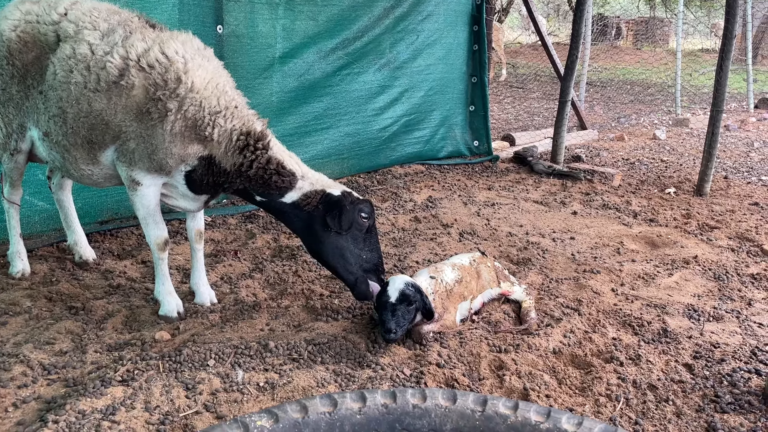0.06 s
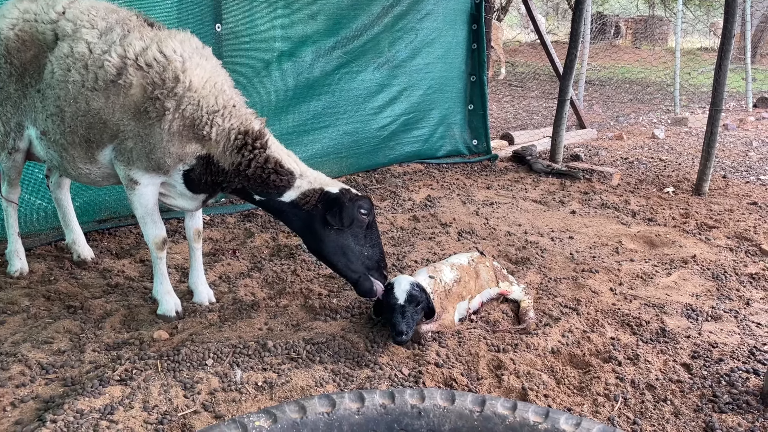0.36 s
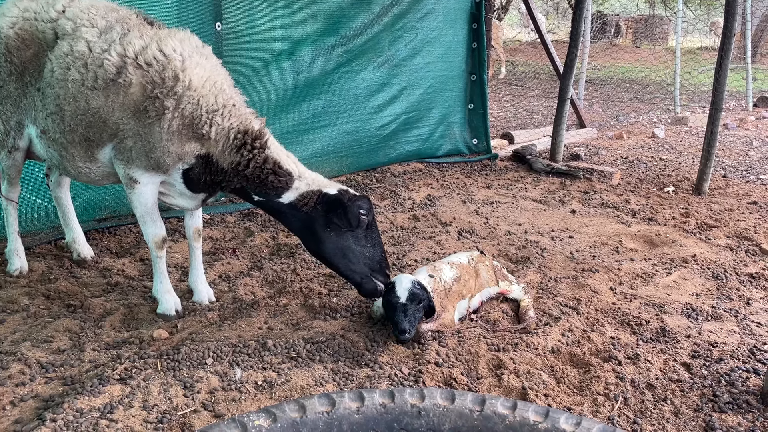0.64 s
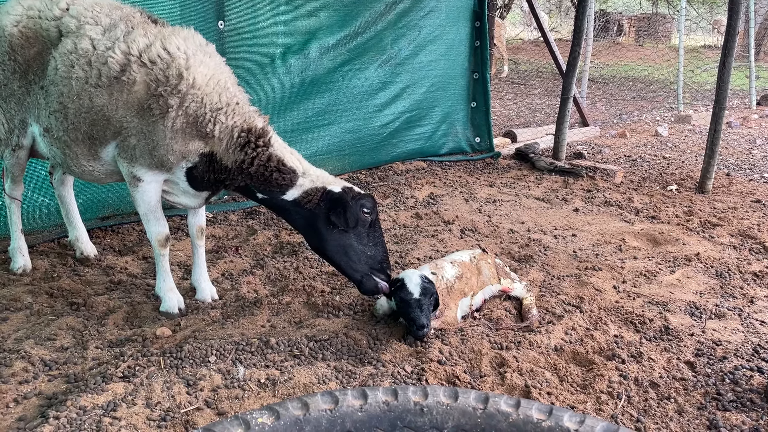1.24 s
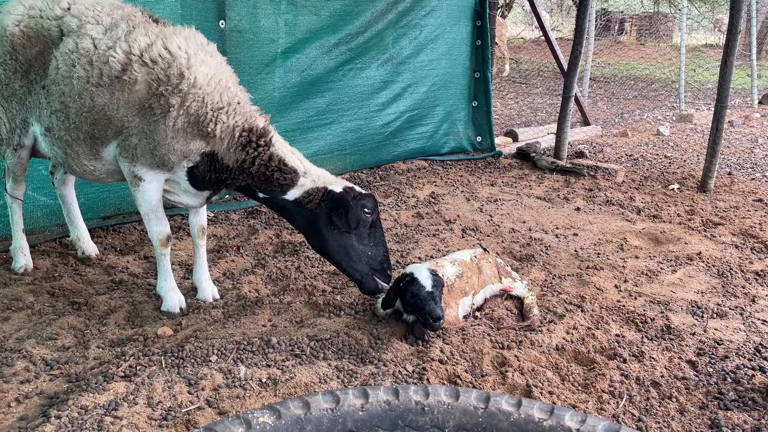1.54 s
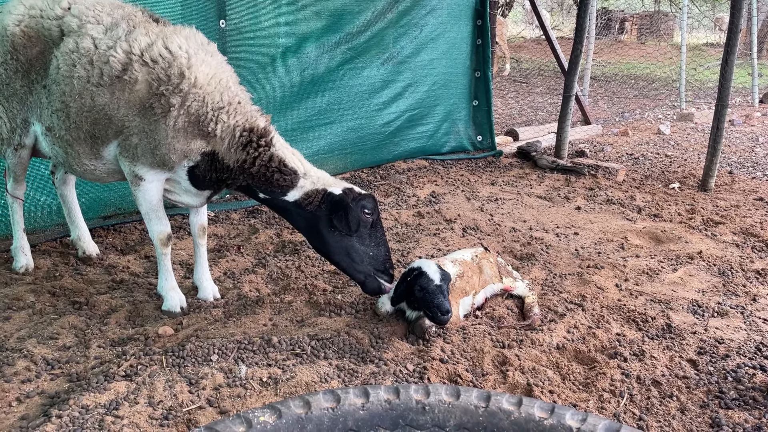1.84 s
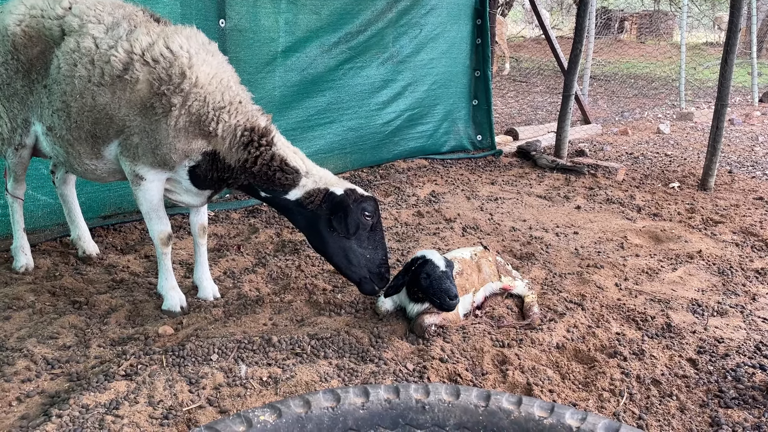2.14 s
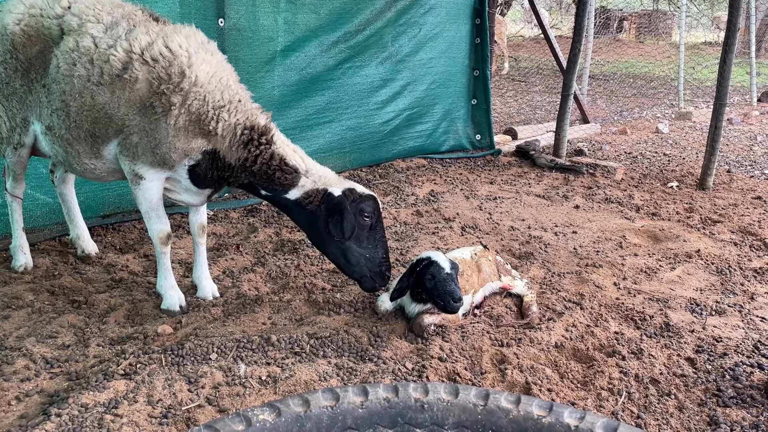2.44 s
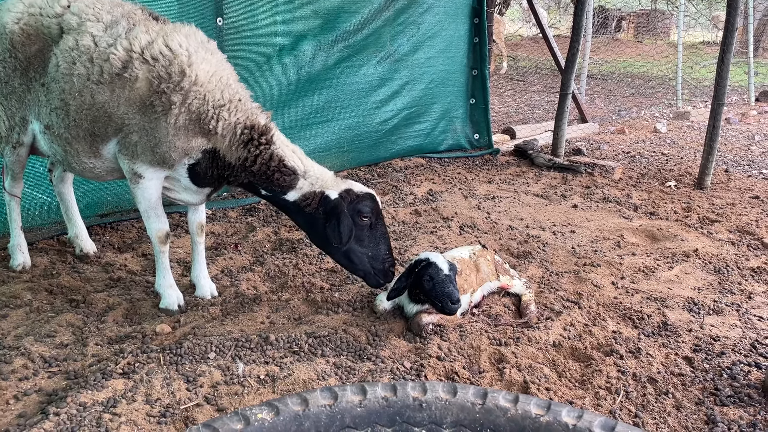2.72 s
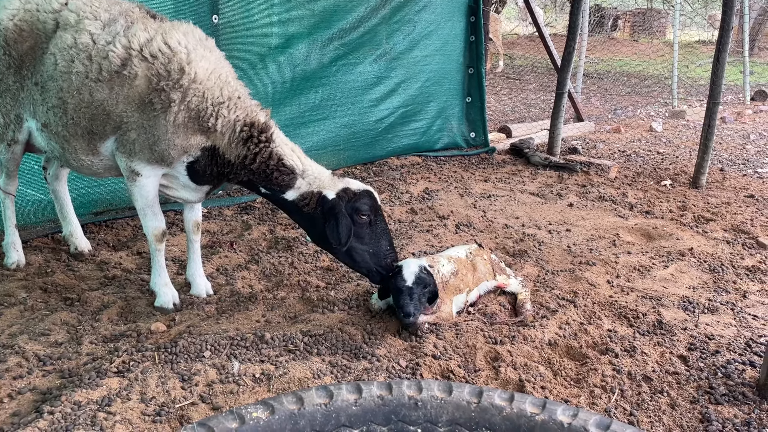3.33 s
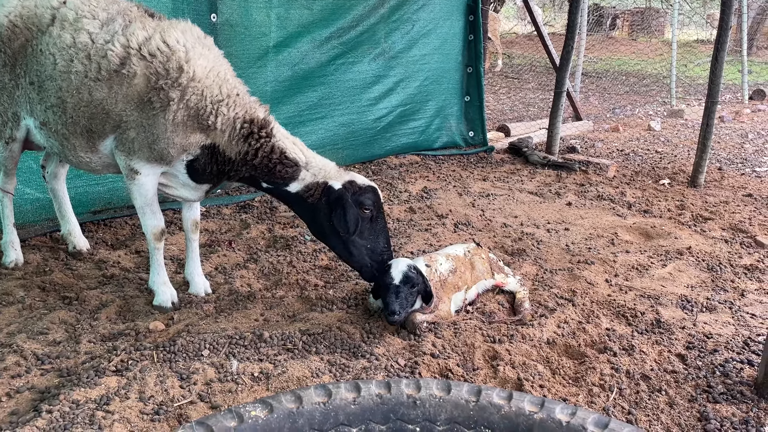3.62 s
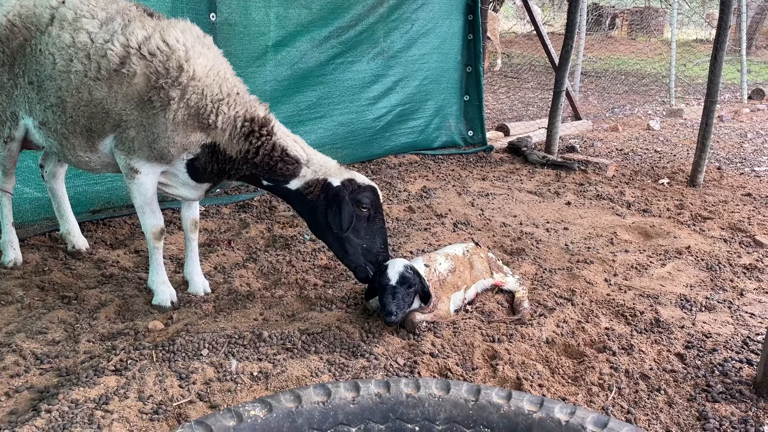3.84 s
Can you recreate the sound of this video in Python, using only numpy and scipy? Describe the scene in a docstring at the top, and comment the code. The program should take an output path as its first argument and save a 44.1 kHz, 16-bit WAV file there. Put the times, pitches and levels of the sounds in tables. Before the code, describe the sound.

A ewe gives a low, quavering bleat and later a fainter grunt, while a bird buzzes and chirps over a low outdoor rumble.

```python
"""An open pen, where a ewe murmurs to her lamb: one low, closed-mouth bleat that breaks into a rattle,
later a short falling grunt. Her vocal folds make the tone, and rattle when they flap unevenly.
A bird nearby sings a long sizzling song of buzzes, chirps and slowing ticks. Dull thumps, a scuff,
snapping straw and a few sharp, high chips (probably a bird's) sound over rumbling air, a low hum
and a distant machine."""
import sys
import numpy as np
from scipy import signal
from scipy.fft import rfft, irfft, next_fast_len
from scipy.io import wavfile
from scipy.ndimage import uniform_filter1d

SR = 44100
rng = np.random.default_rng(int(sys.argv[2]) if len(sys.argv) > 2 else 0)


def bounce(signal):
    """Save signal as a 16-bit WAV file at the path given by the first command-line argument."""
    frames = np.transpose(np.atleast_2d(signal))
    limited = np.clip(frames, -1, 1)
    pcm = np.round(limited * 32767).astype(np.int16)
    wavfile.write(sys.argv[1], SR, pcm)


N = 267246
TIME = np.arange(N) / SR


def from_db(db):
    """Turn decibels into a number to multiply by."""
    return 10 ** (np.asarray(db) / 20)


def rms_one(x):
    """Scale a signal so that its average power is 1."""
    return x / np.sqrt(np.mean(x ** 2) + 1e-20)


def in_time(rows):
    """Join a table's rows with straight lines: one curve for each column after the time."""
    times, *columns = np.transpose(rows)
    return [np.interp(TIME, times, column) for column in columns]


def gain_by_hz(points):
    """Turn (f/Hz, level/dB) rows into a gain for every frequency."""
    hz, db = np.transpose(points)
    return from_db(np.interp(np.log(np.fft.rfftfreq(N, 1 / SR) + 1), np.log(hz), db))


def phase_of(hz):
    """The angle a vibration has turned through so far: 2 pi for each cycle."""
    return 2 * np.pi * np.cumsum(hz) / SR


def drift(per_s):
    """A random wander of about 1 either way; per_s sets how fast it moves."""
    size = next_fast_len(N, real=True)
    rolloff = 1 + (np.fft.rfftfreq(size, 1 / SR) / per_s) ** 4
    return rms_one(irfft(rfft(rng.standard_normal(size)) / rolloff, size)[:N])


def filtered(x, hz, kind):
    """Keep the "low", "high" or "band" part of a sound."""
    return signal.sosfilt(signal.butter(2, hz, kind, fs=SR, output="sos"), x)


def arch(start, length):
    """A rounded rise and fall in loudness."""
    return np.sqrt(np.sin(np.pi * np.clip((TIME - start) / length, 0, 1)) + 1e-15)


def held(start, end, attack_s=0.0063, release_s=0.063):
    """Loudness that rises, holds until the end time, then dies away."""
    return np.clip((TIME - start) / attack_s, 0, 1) * np.exp(-np.maximum(TIME - end, 0) / release_s)


def resonate(x, hz, width_hz):
    """Let a sound ring around one pitch by passing it twice through the same resonance."""
    r = np.exp(-np.pi * width_hz / SR)
    feed = np.array([1, 0, -1]) * (1 - r * r) / 2
    feedback = [1, -2 * r * np.cos(2 * np.pi * hz / SR), r * r]
    for _ in range(2):
        x = signal.lfilter(feed, feedback, x + 1e-18)
    return x


def wavering_tone(hz, waver_hz, waver_per_s):
    """A pure tone whose pitch wanders a little."""
    return np.sqrt(2) * np.sin(phase_of(hz + waver_hz * drift(waver_per_s)))


# how wide the sound is: f/Hz, side level compared with mid/dB
WIDTH = [(30, -4), (65, -11.5), (150, -12), (350, -6), (780, -2.5), (1300, -2.5), (2000, 1), (2800, -4),
         (4100, -4.5), (5200, -3), (7000, -1.5), (8800, 17), (10500, -26), (13000, 1)]
def widen(mid, side):
    """Make left and right: both get mid, while side is added to one and taken from the other."""
    width = gain_by_hz(WIDTH)
    return irfft((rfft(mid) + width * rfft(side) * [[1], [-1]]) / np.sqrt(1 + width ** 2), N)


def noise(colour):
    """Stereo noise; its colour says how strong the lows and highs are compared with each other."""
    white = widen(*rng.standard_normal((2, N)))
    return rms_one(irfft(rfft(white) * gain_by_hz(colour), N))


def narrow_noise(hz, width_hz):
    """Stereo noise gathered round a pitch that may move."""
    phase = phase_of(hz * np.ones(N))
    bands = [drift(width_hz / 2) * np.cos(phase) + drift(width_hz / 2) * np.sin(phase) for _ in range(2)]
    return rms_one(widen(*bands))


def pen_echoes(x, wet_db, t60):
    """Mix in echoes off tarpaulin, posts and ground; they fade by 60 dB in t60 seconds."""
    t = TIME[:SR // 2]
    echoes = rng.standard_normal((2, len(t))) * (rng.random((2, len(t))) < .03) * from_db(-60 * t / t60)
    echoes /= np.sqrt(np.sum(echoes ** 2, axis=1, keepdims=True))
    wet = widen(*signal.fftconvolve(np.atleast_2d(x), echoes, axes=1)[:, :N])
    return (x + from_db(wet_db) * wet) / np.sqrt(1 + from_db(wet_db) ** 2)


# colours of the rumble and of its deepest part: f/Hz, level/dB
RUMBLE_COLOUR = [(32, -51), (55, -3.5), (79, -2), (113, -8.5), (139, -9.5), (161, -20.5), (188, -20),
                 (260, -34.5), (340, -37.5), (570, -120)]
DEEP_COLOUR = [(10, -48), (22, -32), (36, -5.5), (48, 2), (60, -37), (90, -53), (300, -120)]
# how far the rumble eases off: t/s, added level/dB
LULL = [(4.3, -7.5), (4.8, -10.5), (5.42, -8.5), (5.6, -2)]
# gusts: t/s, length/s, rumble level/dB, deep level/dB
GUSTS = [(0.214, 0.11, -48, -67), (0.434, 0.24, -49.5, -59), (0.855, 0.082, -48, -65),
         (1.457, 0.26, -50.5, -55.5), (1.726, 0.2, -48, -52), (2.034, 0.13, -53, -51.5),
         (2.502, 0.29, -49, -63), (3.374, 0.51, -50, -68), (4.255, 0.15, -48.5, -59),
         (4.48, 0.26, -53, -51)]
def wind(base_db=-50, deep_base_db=-66, flutter_db=3.0):
    """Moving air rumbles and swells with each gust."""
    lull_db, = in_time(LULL)
    body = from_db(base_db + lull_db + flutter_db * drift(1.5))
    deep = from_db(deep_base_db)
    for start, length, body_db, deep_db in GUSTS:
        gust = arch(start, length)
        body = np.maximum(body, from_db(body_db) * gust)
        deep = np.maximum(deep, from_db(deep_db) * gust)
    return body * noise(RUMBLE_COLOUR) + deep * noise(DEEP_COLOUR)


# the hum's loudness: t/s, level/dB
HUM_LEVEL = [(.72, -63), (.9, -57), (1.45, -54), (2.15, -55.5), (2.4, -57.5), (4.3, -58.5), (4.8, -72),
             (5.42, -72), (5.6, -63)]
def hum(hz=66.6):
    """A low, wavering hum that swells and sinks."""
    level_db, = in_time(HUM_LEVEL)
    return from_db(level_db + 1.5 * drift(2.5)) * wavering_tone(hz, waver_hz=1.485, waver_per_s=2.91)


# colour of the air around the pen: f/Hz, level/dB
AIR_COLOUR = [(88, -14.5), (150, 0), (519, -14), (626, -15.5), (770, -8), (1080, -20.5), (1730, -23),
              (2920, -22), (3400, -28.5), (4680, -34), (7080, -15), (7920, -15.5), (8380, -21.5),
              (11300, -52.5), (13400, -74)]
def open_air(level_db=-65.0):
    """A soft, flickering outdoor hush."""
    return from_db(level_db + 2.2 * drift(22)) * noise(AIR_COLOUR)


# far-off calls: t/s, length/s, f/Hz, level/dB
FAR_CALLS = [(0.34, 0.46, 1555, -67.5), (1.068, 0.66, 1580, -72), (2.59, 0.43, 1403, -72.5),
             (4.2, 0.43, 1550, -77)]
def far_calls():
    """Each faint call is a swell of noise around one pitch."""
    return sum(from_db(db) * arch(start, length) * narrow_noise(hz, width_hz=230)
               for start, length, hz, db in FAR_CALLS)


def distant_machine(roar_db=-67.5, whine_db=-77.5):
    """A droning roar in one broad resonance, with a thin whine near its centre."""
    white = widen(*rng.standard_normal((2, N)))
    roar = rms_one(resonate(white, hz=780.5, width_hz=129))
    whine = from_db(whine_db + 3 * drift(3)) * wavering_tone(hz=776, waver_hz=2.056, waver_per_s=5.7)
    return from_db(roar_db + 2 * drift(9.5)) * roar + whine


# colour of the scuff: f/Hz, level/dB
SCUFF_COLOUR = [(1200, -13), (2600, -15), (3600, -1.5), (5400, 4.5), (6300, -6), (7800, -15), (9500, -24),
                (13000, -37)]
def dirt_scuff(level_db=-50.5):
    """One short scuff in the dirt: a puff of hiss."""
    swell = held(start=3.378, end=3.455, attack_s=0.033, release_s=0.029)
    return pen_echoes(from_db(level_db) * swell * noise(SCUFF_COLOUR), wet_db=-6, t60=0.085)


# snapping straw: t/s, level before filtering/dB
SNAPS = [(.336, -58), (1.77, -55), (2.112, -53.5)]
def straw_snaps():
    """Dry straw breaks with tiny bursts of bright noise."""
    bursts = sum(from_db(db) * held(start, start, attack_s=.0002, release_s=0.0019) for start, db in SNAPS)
    return filtered(bursts * rng.standard_normal(N), [5000, 13000], "band")


# dull thumps: t/s, level/dB, final f/Hz, swell time/s, sharpness (0-1)
THUMPS = [(.438, -37.5, 62, 0.034, 0.009), (0.581, -42, 53.7, 0.022, 0.059), (2.77, -42, 82.5, 0.013, 0.28),
          (2.820, -49.5, 109, 0.011, 0), (3.379, -44, 109.9, 0.025, 0.4), (4.626, -50.5, 81, 0.011, 0.06),
          (5.065, -47, 77, 0.019, 0), (5.753, -33, 68.3, 0.017, 0.16), (5.856, -49.5, 83.5, 0.032, 0.36),
          (5.970, -39, 61.6, 0.018, 0.23)]
def thumps(dull_hz=900, drop_hz=800, fall_s=0.00473, knock_hz=610, knock_db=-3, knock_s=0.0063):
    """The highs arrive first, so the pitch drops into a short boom; sharp thumps add a hollow knock."""
    out, t = np.zeros(N), TIME[:SR // 12]
    knock = from_db(knock_db) * np.exp(-t / knock_s) * np.sin(2 * np.pi * knock_hz * t)
    for start, db, end_hz, swell_s, sharpness in THUMPS:
        hz = end_hz + drop_hz / (1 + t / fall_s) ** 2
        age = t / swell_s
        body = age ** 2 * np.exp(2 * (1 - age)) + sharpness * np.exp(-age)
        boom = body * np.sin(phase_of(hz)) / (1 + (age / 2) ** 4)
        at = int(start * SR)
        out[at:at + len(t)] += from_db(db) * (boom + sharpness * knock)[:N - at]
    return pen_echoes(filtered(out, dull_hz, "low"), wet_db=-16, t60=.1)


# the tones each chip rings with: f/Hz, level/dB, time to fade by 60 dB/s
CHIP_TONES = [(2075, -11, 0.078), (2704, 0.5, 0.053), (4390, 1, 0.053), (4330, -15, 0.47),
              (6660, -27, 0.068), (11400, -25, 0.16)]
# chips: t/s, level/dB, burst length/s, pitch factor of the upper tones, boost of the two low tones/dB
CHIPS = [(0.23, -44, 0.02, 1.025, -8.5), (0.491, -61.5, 0.016, 1.015, 2.5),
         (0.847, -44.5, 0.0081, 1.04, -2)]
def sharp_chips(attack_s=0.0055, chatter_hz=80, hiss_db=-6):
    """Short, sharp, high chips, probably a bird's: a burst of hiss and shaky tones that ring briefly."""
    out, shake = np.zeros(N), drift(160)
    hiss = filtered(rng.standard_normal(N), [2000, 7500], "band")
    for start, level_db, length, pitch_factor, low_db in CHIPS:
        burst = held(start, start + length, attack_s, release_s=0.0079)
        chip = from_db(hiss_db) * burst * hiss
        for k, (hz, db, t60) in enumerate(CHIP_TONES):
            hz, db = (hz, db + low_db) if k < 2 else (hz * pitch_factor, db)
            ring = held(start, start + length, attack_s, release_s=t60 / np.log(1000))
            chip += from_db(db) * ring * np.sin(phase_of(hz + chatter_hz * shake * burst))
        out += from_db(level_db) * chip
    highs = filtered(out, 2200, "high")   # keep only the highs
    return pen_echoes(highs, wet_db=-13, t60=.35)


# chirps: t/s, length/s, start f/Hz, end f/Hz, level/dB, rasp (0-1)
CHIRPS = [(0.123, 0.045, 4620, 4610, -58.5, 0.03), (0.147, 0.028, 4600, 4170, -66, 0),
          (0.579, 0.0247, 2630, 3300, -66, 0.89), (0.785, 0.04, 2890, 3200, -74, 0.9),
          (0.903, 0.016, 3780, 4150, -61, 1), (0.935, 0.041, 4200, 3460, -65.5, 1),
          (1.005, 0.047, 2995, 3520, -60, 0.73), (1.092, 0.027, 5850, 3320, -50, 0.34),
          (1.11, 0.034, 5300, 3150, -53.5, 0.37), (1.153, 0.021, 4940, 3620, -57.5, 0.6),
          (1.167, 0.039, 5200, 3860, -59, 0.43), (1.205, 0.02, 5900, 5440, -59, 0.74),
          (1.218, 0.044, 5480, 4850, -49.5, 0.64), (1.26, 0.027, 4620, 5630, -58.5, 0.76),
          (3.117, 0.13, 10750, 10100, -65.5, 0.2), (3.233, 0.1, 10100, 9800, -77, 0.8),
          (4.808, 0.026, 3830, 3030, -74, 0.06), (4.823, 0.03, 6650, 5900, -73, 0.15),
          (4.85, 0.04, 5450, 4800, -70, 0.15), (4.865, 0.039, 5850, 5700, -69, 0.1),
          (4.874, 0.048, 4000, 3020, -74.5, 0.1), (4.905, 0.034, 4750, 4300, -66, 0.2),
          (4.908, 0.072, 5780, 4760, -65, 0.2), (4.978, 0.045, 5830, 5350, -70, 0.3),
          (5.028, 0.045, 3316, 3280, -72, 0), (5.151, 0.034, 3070, 3070, -66, 0.5),
          (5.264, 0.046, 3020, 2977, -64, 0.1), (5.863, 0.074, 9500, 9700, -84, 0.4),
          (5.915, 0.088, 9800, 9750, -78, .3), (5.995, 0.078, 9650, 9600, -85, 0.4)]
def bird_chirps(rasp_hz=400):
    """Gliding whistles that start firmly; a fast shake of the pitch makes some of them raspy."""
    out, shake = np.zeros(N), drift(530)
    for start, length, start_hz, end_hz, db, rasp in CHIRPS:
        along = np.linspace(0, 1, int(length * SR))
        shake_hz = rasp * rasp_hz * np.roll(shake, rng.integers(N))[:len(along)]
        hz = start_hz + (end_hz - start_hz) * along + shake_hz
        swell = 2 * np.minimum(along * 6, 1) * np.sqrt(1 - along)
        note = from_db(db) * swell * np.sin(phase_of(hz))
        at = int(start * SR)
        out[at:at + len(note)] += note[:N - at]
    return pen_echoes(out, wet_db=-6, t60=.2)


# the ticking that ends the song: t/s, ticks per second, level/dB
TICKS = [(3.82, 85, -62), (4.3, 67, -62), (4.5, 58.7, -58.5), (4.72, 52, -58.5), (5.0, 40, -61.5),
         (5.3, 29.3, -62), (5.43, 27, -59), (5.48, 26, -68), (5.65, 23, -64)]
def bird_ticks(pip_s=0.0037, centre_hz=4250, sink_hz_per_s=140, fall_hz=280, high_hz=6850, wobble_hz=250):
    """A slowing, sinking run of husky pips, each sliding down; for a while a higher note joins in."""
    rate, level_db = in_time(TICKS)
    start, end = TICKS[0][0], TICKS[-1][0]
    count = np.cumsum(rate) / SR
    count -= np.interp(5.138, TIME, count)   # one tick falls at this time and sets the beat
    from_pip_s = ((count + .5) % 1 - .5) / rate
    pips = np.exp(-(from_pip_s / pip_s) ** 2)
    low_hz = centre_hz - sink_hz_per_s * np.maximum(TIME - start, 0)
    low_hz -= fall_hz * np.tanh(from_pip_s / pip_s)
    low_gain = from_db(level_db) * held(start, end, attack_s=0.0078, release_s=0.018)
    high_gain = from_db(-63) * held(start=4.39, end=4.68)
    notes = sum(gain * np.sin(phase_of(hz + wobble_hz * drift(394)))
                for hz, gain in [(low_hz, low_gain), (high_hz, high_gain)])
    return pen_echoes(pips * notes, wet_db=-4, t60=.1)


# how the song pulses: t/s, pulses per second, pulsed share (0-1)
TRILL = [(0, 155, 0.7), (0.698, 180, 0.75), (1.451, 59, 0.28), (2.098, 77, 0.49), (2.502, 128, 0.4),
         (3.149, 193, 0.24), (3.602, 110, 0.6), (3.8, 102, .9), (4.101, 77, 0.1), (6.06, 33, 0.1)]
def bird_trill(decay=4.5, unevenness_db=3.0):
    """The fast, uneven pulsing of loudness that makes the song buzz."""
    log_rate, share = in_time([(t, np.log(per_s), share) for t, per_s, share in TRILL])
    cycle = np.cumsum(np.exp(log_rate)) / SR % 1
    rounded = uniform_filter1d(np.exp(-decay * cycle), size=48)
    pulses = rms_one(rounded * from_db(unevenness_db * drift(21)))
    return np.sqrt(1 - share + share * pulses ** 2)


# colours of the bird's lower voice and of the sizzle on top: f/Hz, level/dB
LOW_COLOUR = [(1120, -27), (1900, -13), (2510, -9.5), (2870, -5.5), (3450, -9), (3930, -2.5), (4350, -5.5),
              (4760, -1), (5050, -4), (5500, -2.5), (6000, -7.5), (7800, -26), (13200, -120)]
SIZZLE_COLOUR = [(4470, -18.5), (7600, 13.5), (7890, -22), (8220, 9), (8980, 5.5), (9890, -8),
                 (11400, -2.5), (12500, -14.5), (13400, -10.5)]
# lower voice: start t/s, end t/s, start level/dB, end level/dB, sizzle compared with it/dB, swell time/s
PHRASES = [(0, 0.407, -65.5, -64.5, 0, 0.0022), (0.482, 1.407, -67.5, -63, -4, 0.0077),
           (1.46, 2.263, -60.5, -59, -9.5, 0.11), (2.272, 2.47, -57, -57, -5.5, 0.11),
           (2.526, 3.123, -61.5, -59.5, -3.5, 0.054), (3.2, 3.795, -69.5, -78, -10, .05),
           (3.811, 5.826, -63, -71.5, -4.5, 0.025)]
# upper voice: start t/s, end t/s, start f/Hz, end f/Hz, width/Hz, level/dB
BUZZES = [(0.689, 1.054, 5740, 6190, 1230, -59.5), (1.07, 1.412, 6150, 5880, 1280, -60),
          (2.052, 2.655, 6200, 6560, 1310, -71.5), (2.567, 3.095, 8760, 8730, 905, -59.5),
          (2.658, 3.119, 6400, 6500, 1150, -60.5), (3.499, 3.929, 5720, 6080, 870, -65.5),
          (4.249, 5.246, 6570, 6850, 1307, -73.5), (5.548, 5.681, 6380, 6520, 497, -69.5)]
def bird_song():
    """A broad lower voice, a narrow upper voice and a sizzle, all chopped by the same trill."""
    chop = bird_trill()
    low_gain, sizzle_gain, high = 0, 0, 0
    for start, end, start_db, end_db, sizzle_db, swell_s in PHRASES:
        gain = held(start, end, swell_s) * from_db(np.interp(TIME, [start, end], [start_db, end_db]))
        low_gain = np.maximum(low_gain, gain)
        sizzle_gain = np.maximum(sizzle_gain, gain * from_db(sizzle_db))
    low = low_gain * noise(LOW_COLOUR)
    sizzle = sizzle_gain * noise(SIZZLE_COLOUR)
    for start, end, start_hz, end_hz, width_hz, db in BUZZES:
        hz = np.interp(TIME, [start, end], [start_hz, end_hz])
        high += from_db(db) * held(start, end) * narrow_noise(hz, width_hz)
    return pen_echoes((low + high) * chop + sizzle * np.sqrt(chop), wet_db=0.0, t60=0.09)


# where the ewe's throat and nose ring: f/Hz, width/Hz, bleat level/dB, grunt level/dB
THROAT = [(272, 168, 27, 16.5), (816, 310, 7, 8.5), (1243, 380, 19.5, 10), (2060, 840, 20, 3)]
def throat_rasp(phase, grunting):
    """Each time the vocal folds close, a puff of noise rings in the throat."""
    puffs = np.exp(-2 * (phase / (2 * np.pi) % 1)) * rng.standard_normal(N)
    return rms_one(sum(from_db(grunt_db if grunting else bleat_db) * resonate(puffs, hz, width_hz)
                       for hz, width_hz, bleat_db, grunt_db in THROAT))


# pushes within the grunt: t/s, added voice level/dB, added rasp level/dB
PUSHES = [(3.513, 7.5, 5), (3.553, 3.5, 2.5), (3.616, 10, 6), (3.683, 4.5, 1), (3.799, 8, -10),
          (3.861, 4, 0), (3.911, -21, 9)]
def ewe_grunt(start=3.31, peak=3.493, end=3.96, start_hz=185.7, sag_hz_per_s=105, push_s=0.016):
    """Slack vocal folds flap unevenly as the pitch sinks; pushes of effort make the voice throb."""
    hz = start_hz - sag_hz_per_s * (np.clip(TIME, start, end) - start)
    level_db = -53 + np.minimum(31 * (TIME - peak), -16 * (TIME - peak))   # swell and fade in dB per s
    voice_db, rasp_db = sum(np.outer(added_db, np.exp(-((TIME - t) / push_s) ** 2))
                            for t, *added_db in PUSHES)
    phase = phase_of(hz * (1 + .12 * drift(50)))
    flap = from_db(voice_db) * rms_one(np.sin(phase) * from_db(4 * drift(67)))
    rasp = from_db(rasp_db - 9.5) * throat_rasp(phase, grunting=True)
    return from_db(level_db) * (flap + rasp) * held(start, end, attack_s=0.015, release_s=0.026)


# overtones of the closed-mouth voice: multiple of the pitch, level/dB
OVERTONES = [(2, -18.5), (3, -28), (4, -31.5), (5, -35)]
# rattle tones between them: multiple of a third of the pitch, level/dB
RATTLE = [(2, -2.5), (4, -6.5), (5, -3), (7, -12.5), (8, -5.5), (10, -23.5), (11, -23), (13, -20),
          (14, -17.5)]
# course of the bleat: t/s, f/Hz, level/dB, rattle compared with the voice/dB
BLEAT = [(0, 195.9, -41, -17.5), (.12, 192, -41.5, -17), (.21, 192.9, -41.5, -10), (.38, 196.1, -43, -13),
         (.44, 197.4, -44, -14), (.5, 192.8, -47.5, -23), (.565, 203.4, -55.5, -16), (.595, 201, -80, -14)]
def ewe_bleat(quaver_per_s=9.8, quaver_hz=2.3, jitter=0.013, shimmer_db=4.5, growl_db=-12, rasp_db=-21):
    """A quavering nasal tone; the folds slip into repeating every third cycle, then every second."""
    hz, level_db, rattle_db = in_time(BLEAT)
    quaver = np.cos(2 * np.pi * quaver_per_s * TIME)
    catch = np.exp(-((TIME - .191) / 0.012) ** 2)   # the voice catches once: pitch and level dip
    hz = hz + quaver_hz * quaver - 16 * catch
    level_db = level_db - 6 * catch
    phase = phase_of(hz * (1 + jitter * drift(45)))
    rattle_gain = from_db(rattle_db) * (1 - catch)
    smoothness = 1 / (1 + (rattle_gain / 0.25) ** 2)   # the rattle takes over from the plain overtones
    overtones = sum(from_db(db + shimmer_db * drift(8.6)) * np.sin(k * phase) for k, db in OVERTONES)
    rattle = sum(from_db(db + shimmer_db * drift(21)) * np.sin(k * phase / 3 + rng.uniform(0, 2 * np.pi))
                 for k, db in RATTLE)
    growl_swell = held(start=.36, end=0.5, attack_s=.05, release_s=0.085)
    growl = from_db(growl_db + shimmer_db * drift(21)) * growl_swell * np.sin(1.5 * phase)
    tones = np.sin(phase) + smoothness * overtones + rattle_gain * rattle + growl
    voice = np.sqrt(2) * tones + from_db(rasp_db) * throat_rasp(phase, grunting=False)
    return from_db(level_db) * voice * (TIME < BLEAT[-1][0])


def off_centre(x, lag_s=0.00045, max_radians=1.45):
    """The sound reaches the left side a little later; for high tones the phase gap grows no more."""
    gap = np.minimum(2 * np.pi * np.fft.rfftfreq(N, 1 / SR) * lag_s, max_radians)
    return np.array([irfft(rfft(x) * np.exp(-1j * gap), N), x])


def scene():
    """The ewe close by, the bird and the small noises of the pen farther off."""
    ewe = off_centre(ewe_bleat() + ewe_grunt())
    bird = bird_song() + bird_ticks() + bird_chirps()
    pen_noises = sharp_chips() + thumps() + dirt_scuff() + straw_snaps()
    background = wind() + hum() + open_air() + far_calls() + distant_machine()
    return background + pen_noises + bird + ewe


def record(dry):
    """Cut the treble steeply above 13600 Hz."""
    return signal.sosfilt(signal.ellip(10, .1, 80, 13600, fs=SR, output="sos"), dry)


dry = scene()
out = record(dry)
bounce(out)
```